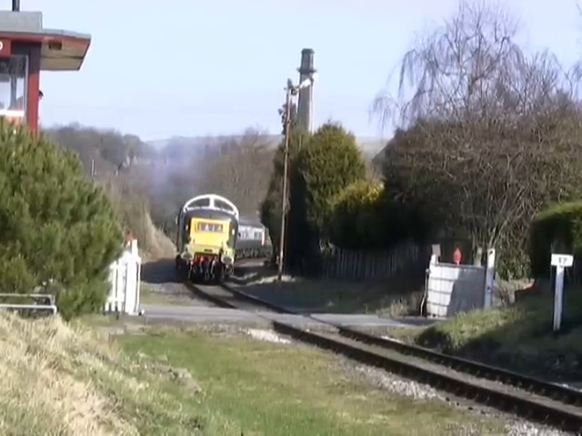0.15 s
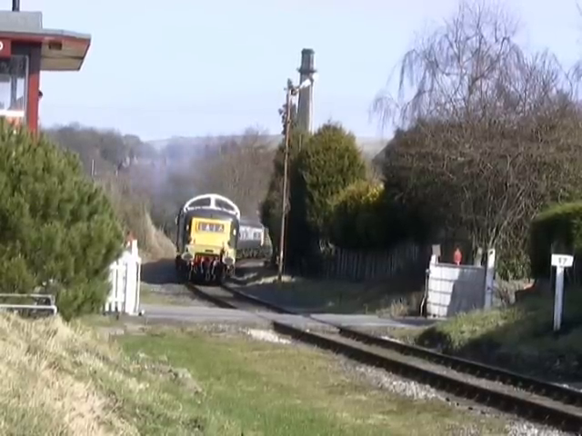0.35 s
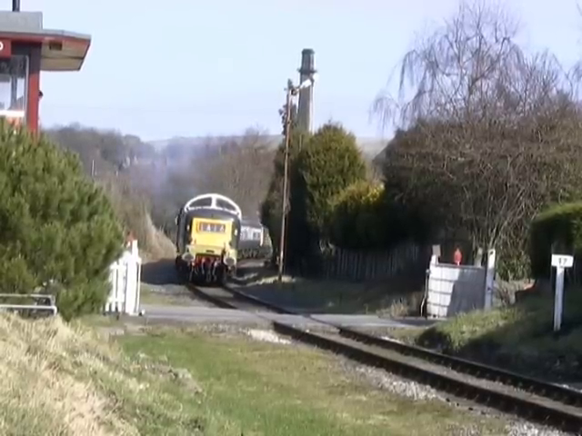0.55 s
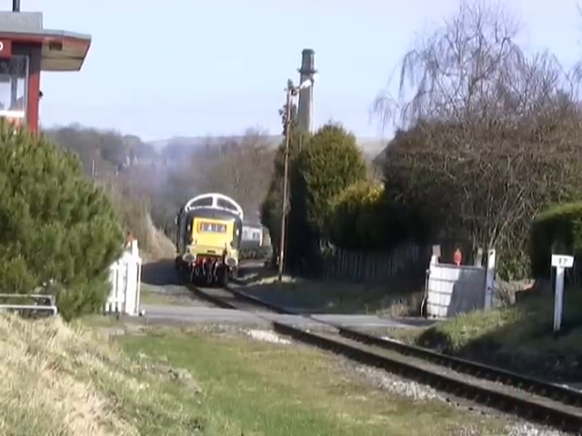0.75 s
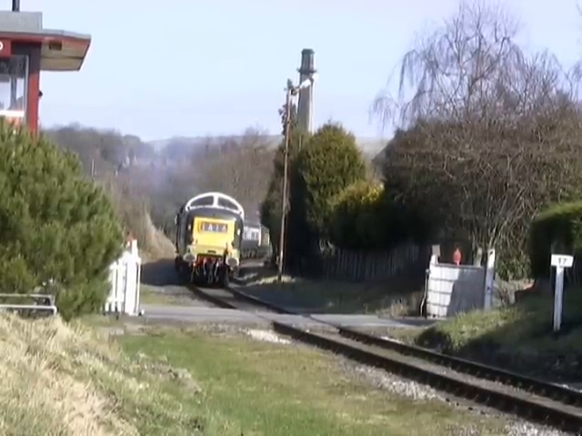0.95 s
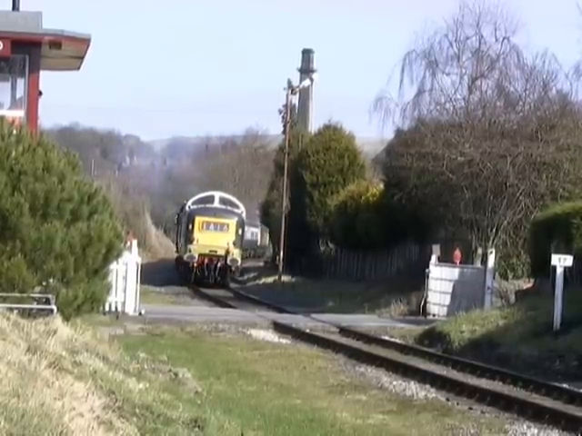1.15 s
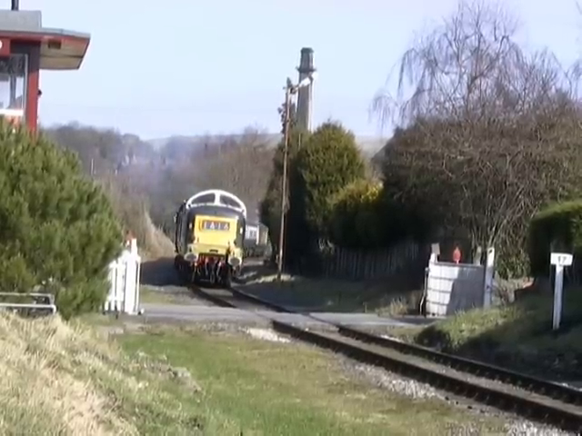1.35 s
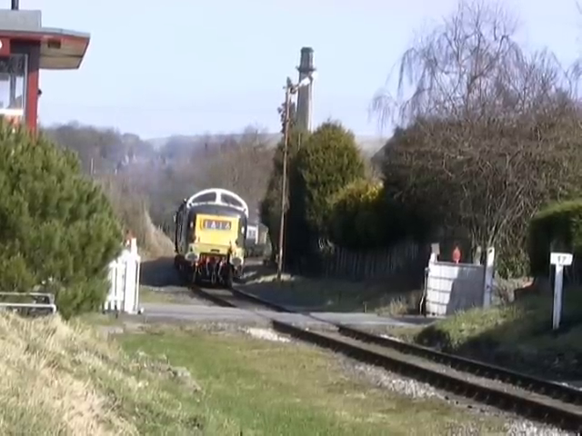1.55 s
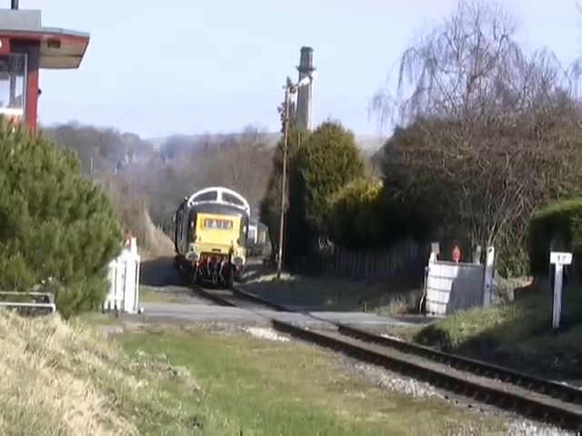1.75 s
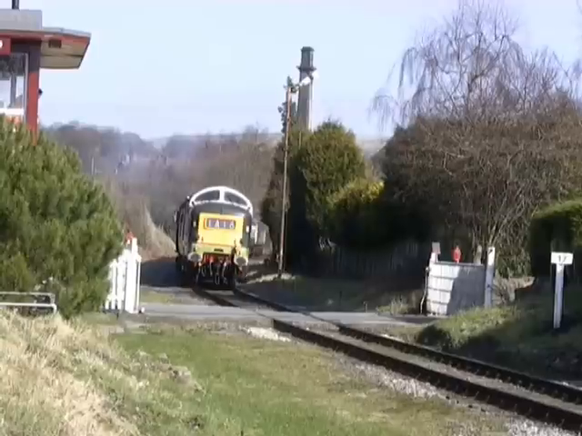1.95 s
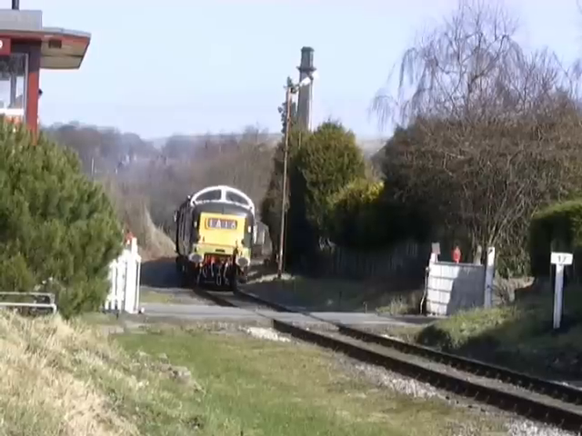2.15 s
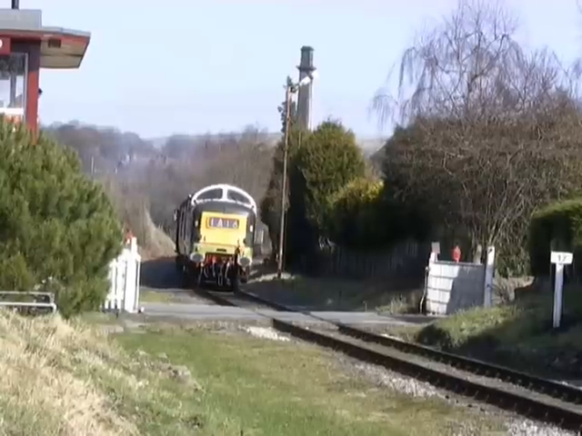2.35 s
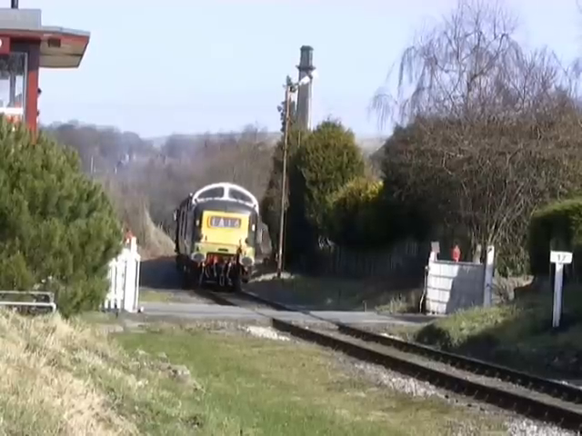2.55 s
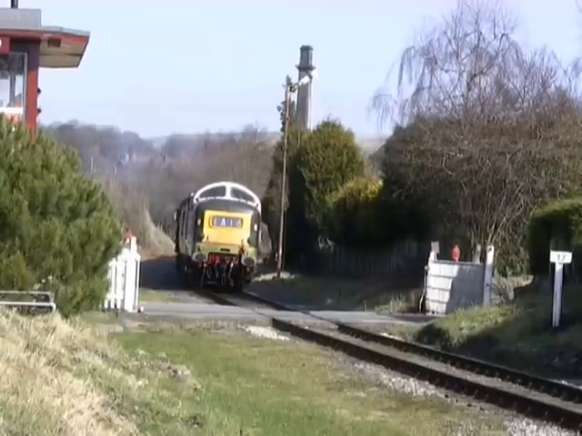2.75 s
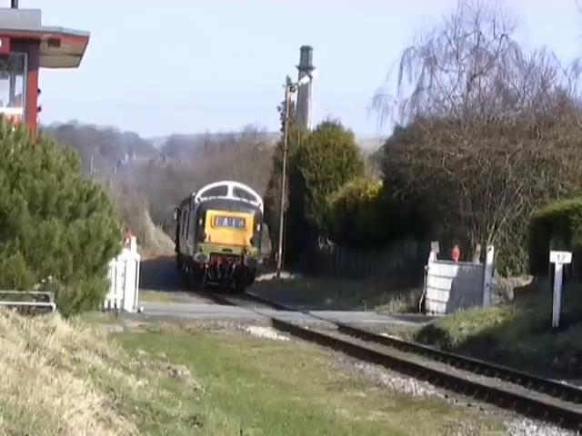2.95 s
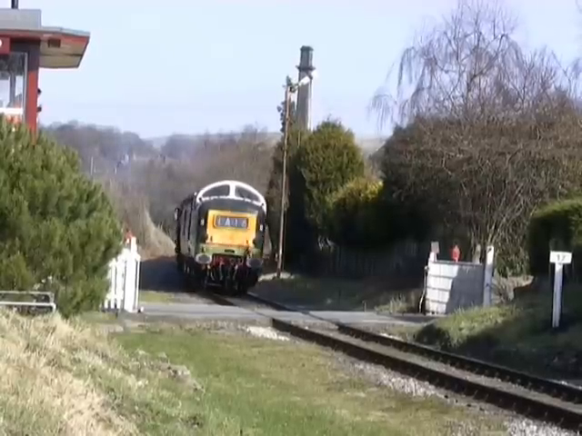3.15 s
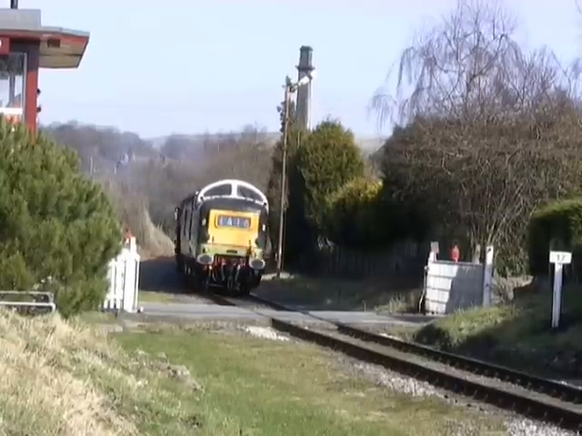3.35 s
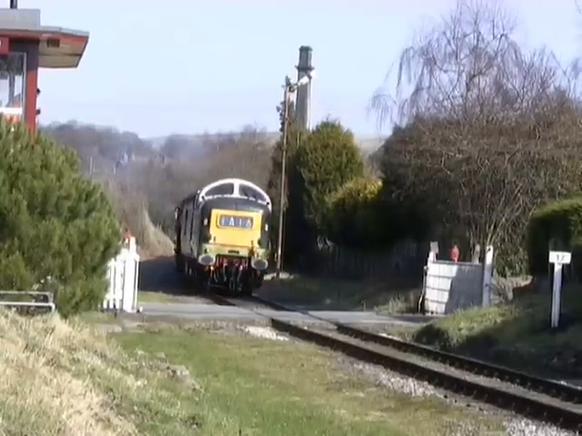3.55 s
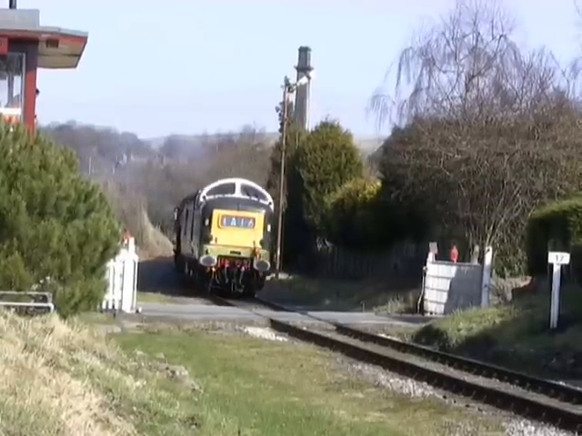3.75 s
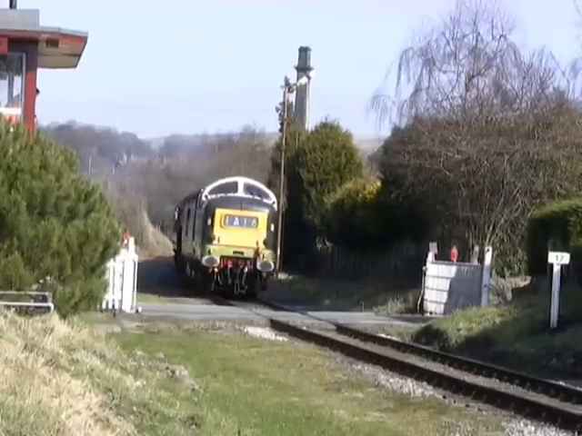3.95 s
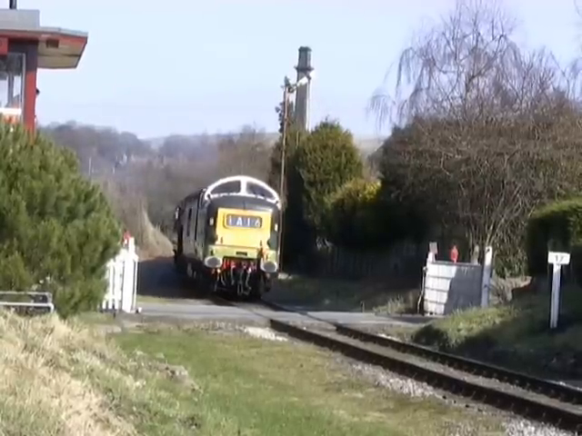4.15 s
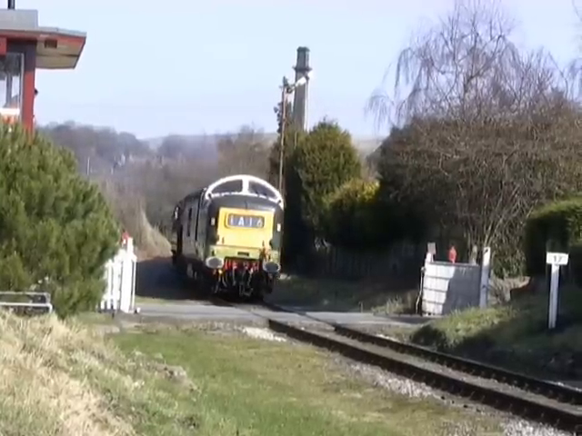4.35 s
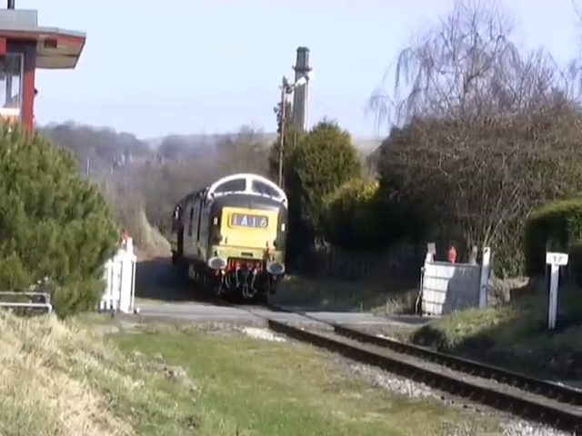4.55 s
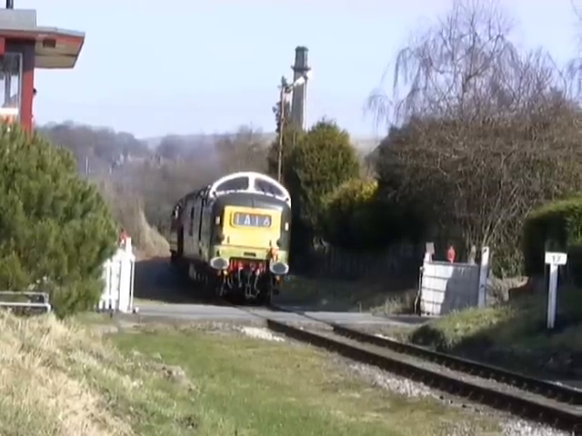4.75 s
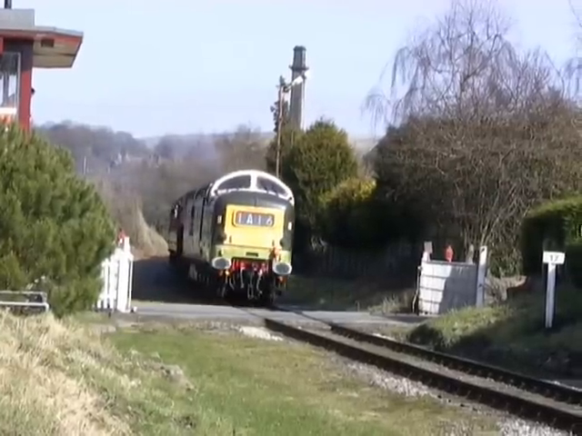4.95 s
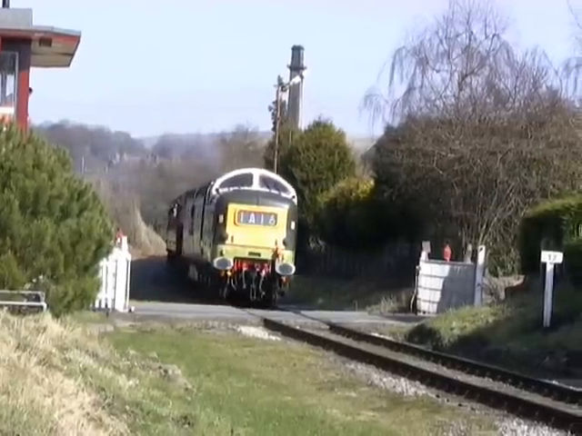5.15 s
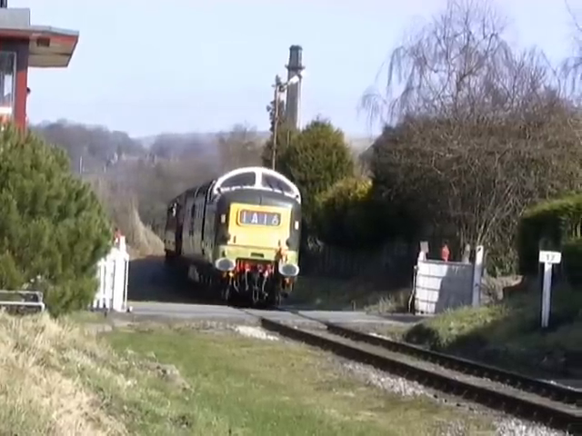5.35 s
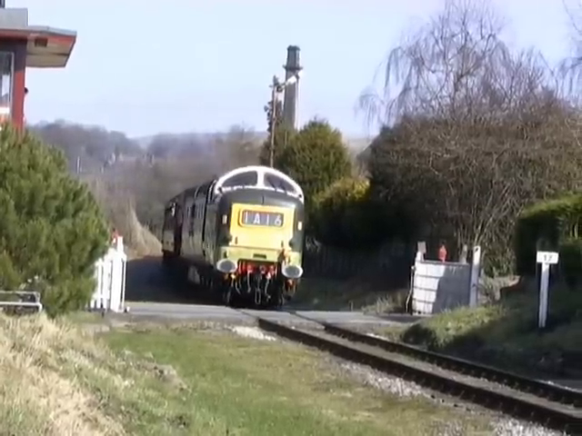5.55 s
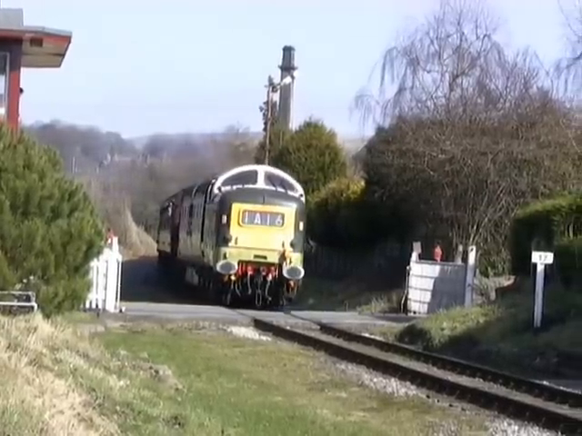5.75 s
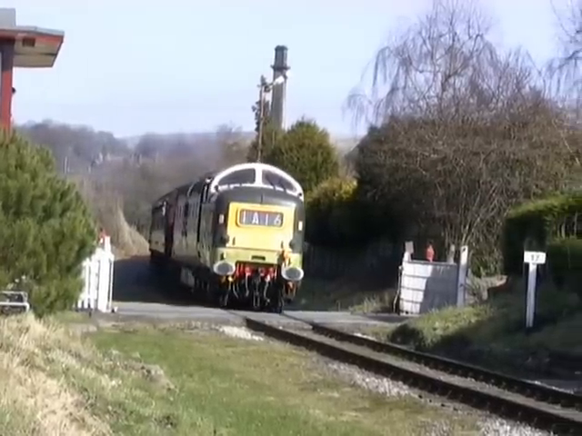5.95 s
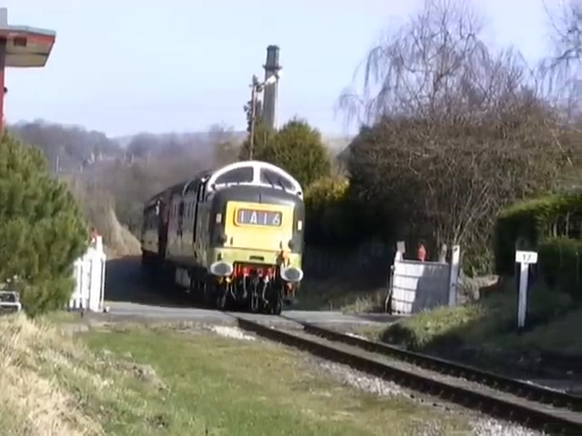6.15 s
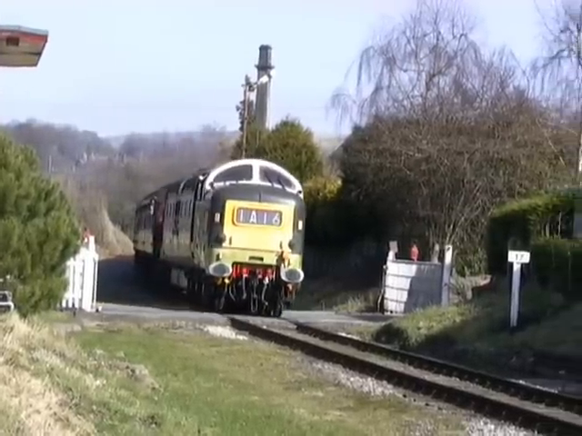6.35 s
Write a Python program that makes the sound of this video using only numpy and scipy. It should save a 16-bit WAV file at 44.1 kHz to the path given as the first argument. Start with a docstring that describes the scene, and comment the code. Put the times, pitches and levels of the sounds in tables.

```python
"""A two-stroke diesel locomotive opens up and rolls towards a listener beside the track.
Sines at crank orders beat against a tone geared to the crank; whines and whistles are narrow-band noise
inside a broad roar of shaped noise. Faint filtered clicks follow, low noise swells as wind stirs two
microphone ports, two crank orders grow as the load comes on, and the treble noise rises as it nears."""
import sys
import numpy as np
from scipy import signal
from scipy.fft import rfft, irfft, next_fast_len
from scipy.io import wavfile
from scipy.ndimage import uniform_filter1d

SR = 44100
rng = np.random.default_rng(int(sys.argv[2]) if len(sys.argv) > 2 else 0)


def unload_wav(signal):
    """Save mono or channel-first audio to the path in sys.argv[1] as 16-bit WAV at rate SR, clipped to [-1, 1]."""
    wavfile.write(
        sys.argv[1],
        SR,
        np.round(np.clip(np.atleast_2d(signal).T, -1, 1) * 32767).astype(np.int16),
    )


N = 283122
TIME = np.arange(N) / SR

# Broadband level of the locomotive. Each row: time in seconds, roar level in dB rms before puffing,
# lower treble level in dB rms before flicker.
BROADBAND_LEVEL = [(0, -27.5, -49), (.35, -26.5, -51), (.6, -26, -50), (1.1, -27, -50), (1.5, -28, -52),
                   (2, -28.5, -53), (3, -27.5, -50.5), (3.38, -26.5, -48), (3.45, -25, -45),
                   (3.55, -25.5, -49), (3.9, -26, -46.5), (4.25, -25, -44.5), (4.4, -24, -45),
                   (4.7, -22.5, -45), (4.76, -23, -42), (4.9, -22.5, -42), (5.3, -21.5, -41.5),
                   (5.5, -24.5, -41.5), (5.62, -21.5, -41.5), (5.7, -20.5, -38), (5.86, -20.5, -37.5),
                   (5.92, -21, -39.5), (5.97, -24.5, -42.5), (6.15, -21, -40), (6.42, -22, -41)]
# Coherence between the channels. Each row: frequency in Hz, left-right likeness from 0 to 1.
CHANNEL_LIKENESS = [(60, 0.88), (300, 0.97), (1500, 0.93), (4000, 0.74), (9000, 0.52)]


def gain_of(db):
    """Level to amplitude: 20 dB is a factor of ten."""
    return 10 ** (np.asarray(db) / 20)


def evened(x):
    """Power normalisation: scales the mean square to 1."""
    return x / np.sqrt(np.mean(x ** 2) + 1e-20)


def read(points, hz):
    """Interpolates a spectrum along a logarithmic frequency axis."""
    f, value = np.transpose(points)
    return np.interp(np.log(hz + 1), np.log(f + 1), value)


def columns(rows, t=TIME):
    """Linear interpolation of each column of a curve table at times t."""
    s, *rest = np.transpose(rows)
    return [np.interp(t, s, c) for c in rest]


def turns_of(hz):
    """Phase is the time integral of frequency, here in turns."""
    return np.cumsum(hz) / SR


def drift(rate_hz, span=10):
    """Slow chance of rms 1: random-phase sines from rate_hz / span to rate_hz, power falling as 1/f."""
    t = TIME[::256]
    waves = 0
    for f in np.geomspace(rate_hz / span, rate_hz, 16):
        waves = waves + np.sin(2 * np.pi * (f * t + rng.random())) / np.sqrt(f)
    return np.interp(TIME, t, evened(waves))


def noise(colour_db, likeness, patchy_db, size=1024):
    """Partly coherent two-channel noise of rms 1, shaped by colour_db(hz, t) and mottled by patches."""
    frames = N * 4 // size + 5
    hz = np.fft.rfftfreq(size, 1 / SR)[:, None]
    a, b, c, d, patches = rng.standard_normal((frames, len(hz), 5)).T
    patches = uniform_filter1d(patches, 10, 0)  # smooth over frequency, then time
    patches = evened(uniform_filter1d(patches, 12, 1))
    shape = gain_of(colour_db(hz, np.arange(frames) * size / 4 / SR)) * np.ones(frames)
    shape = shape / np.linalg.norm(shape, axis=0)  # equal power per frame ahead of the patches
    shape = shape * gain_of(patchy_db * patches)
    same = np.clip(likeness(hz), -1, 1)
    left, other = a + 1j * b, c + 1j * d
    right = same * left + np.sqrt(1 - same ** 2) * other
    spectra = np.array([left, right]) * shape
    return evened(signal.istft(spectra, nperseg=size, noverlap=size * 3 // 4)[1][:, :N])


def whistle(hz, width_hz, steady):
    """Random modulation broadens a carrier on the curve hz to rms 1; steady is its share of even level."""
    r = np.exp(-np.pi * width_hz / SR)  # pole of the low-pass, applied twice
    slow = rng.standard_normal(N) + 1j * rng.standard_normal(N)
    for _ in range(2):
        slow = signal.lfilter([1 - r], [1, -r], slow)
    slow = slow / (abs(slow) + 1e-12) ** steady
    return evened((slow * np.exp(2j * np.pi * turns_of(hz))).real)


def singing(multiple, t=TIME):
    """Level modulation in dB: an arch for each time that one tone sings out or drops away."""
    # Each row: middle in seconds, length in seconds, rounded multiple of the crank, rise in dB.
    arches = [(.2, .3, 73, 6), (.6, 1.6, 80, -9), (.32, .84, 44, 7), (.57, .32, 21, 11), (.65, .78, 57, 15),
              (.7, .65, 42, 12), (.75, .65, 55, 12), (.77, .65, 56, 18), (.33, .16, 27, 9), (.8, .5, 27, 8),
              (.8, .65, 48, 6), (.8, .78, 47, 10), (.87, .84, 45, 7), (1.05, .65, 46, 8),
              (1.2, .39, 43, 11), (1.25, .35, 55, 9), (1.22, .45, 54, 11), (1.3, .65, 35, 12),
              (1.55, .52, 34, 9), (.95, .5, 33, 5), (1.7, .52, 54, 11), (1.75, .39, 25, 9),
              (1.85, .52, 26, 9), (2.54, .52, 27, 4), (2.57, .32, 25, 10), (2.84, .39, 12, 7),
              (3.59, .3, 27, 6), (3.69, .39, 15, 8), (4.23, .42, 27, 10), (4.41, .32, 13, 6),
              (4.74, 1.1, 12, 5), (4.72, .66, 27, -10), (4.95, .55, 80, 8), (4.99, .39, 19, 8),
              (5.04, .39, 42, 9), (5.22, .34, 27, 8), (5.35, .2, 80, 12), (5.5, .72, 48, 12),
              (5.53, .22, 27, -7), (5.69, .52, 31, 12), (5.4, .5, 55, 8), (5.85, .5, 55, 9),
              (5.76, .16, 27, 8), (5.86, .1, 27, -6), (5.78, .3, 45, 13), (5.89, .52, 19, 8),
              (5.88, .62, 34, 14), (6.1, .4, 27, 11), (6.12, .62, 73, 10), (6.19, .52, 80, 6),
              (6.26, .32, 12, 7), (6.26, .32, 45, 9), (6.29, .3, 15, 6), (6.29, .3, 55, 6)]
    rise = 0
    for s, length, k, rise_db in arches:
        if k == round(multiple):
            angle = np.pi * np.clip((t - s) / length, -.5, .5)
            rise = rise + rise_db * np.sqrt(abs(np.cos(angle)))
    return rise


def strong_tones(crank_hz, order_db, geared_db):
    """Periodic exhaust gives crank orders; a geared tone near order 10 beats against it."""
    # Crank orders with their own level curves.
    loud_orders = (7, 9)
    # Orders that grow with load. Each row: order, light level in dB rms, loaded level in dB rms,
    # before waver.
    loaded_orders = [(8, -44, -31), (10, -35.5, -24.5)]
    # Start and end of the load coming on, in seconds.
    load_times = (2.3, 4.6)
    geared_multiple, geared_lag_turns = 9.89, .15  # the lag behind order 10 sets the phase of the beat
    waver_db, waver_turns = 2, .04
    turns = turns_of(crank_hz)
    load = np.sin(np.pi / 2 * np.interp(TIME, load_times, (0, 1))) ** 2
    out = np.zeros(N)
    for k, db in zip(loud_orders, order_db):
        phase = k * turns + rng.random() + waver_turns * drift(6)
        out += gain_of(db + waver_db * drift(14)) * np.cos(2 * np.pi * phase)
    for k, light_db, loaded_db in loaded_orders:
        start = rng.random()  # the last one, of order 10, also serves the geared tone
        db = light_db + load * (loaded_db - light_db) + 0.97 * drift(4.4)
        out += gain_of(db) * np.cos(2 * np.pi * (k * turns + start))
    phase = geared_multiple * turns + start - geared_lag_turns + waver_turns * drift(6.5)
    out += gain_of(geared_db + waver_db / 2 * drift(7.8)) * np.cos(2 * np.pi * phase)
    return np.sqrt(2) * out  # rms to peak of a sine


def weak_tones(crank_hz):
    """Harmonic series of the crank and geared tones; they swell and fade as the air path shifts."""
    # Each row: crank order, levels in dB rms while opening up, while easing and when near,
    # before singing and waver.
    crank_orders = [(3, -57, -53, -51), (5, -52, -49, -40), (6, -46, -56, -49), (11, -52, -53, -48),
                    (12, -45, -41, -37), (13, -43, -39, -37), (15, -44, -44, -38), (16, -50, -44, -41),
                    (17, -51, -48, -48), (18, -45, -45, -45), (19, -45, -45, -42), (20, -45, -51, -45),
                    (21, -47, -52, -50), (24, -45, -47, -44), (25, -42, -45, -46), (26, -52, -46, -50),
                    (27, -41, -48, -39), (28, -51, -54, -48), (30, -47, -50, -58), (31, -48, -53, -52),
                    (32, -49, -59, -58), (33, -41, -48, -48), (34, -40, -52, -52), (35, -46, -58, -58),
                    (36, -53, -63, -56), (37, -55, -64, -51), (39, -48, -60, -53), (40, -53, -62, -57),
                    (41, -50, -53, -57), (42, -52, -64, -47), (43, -50, -62, -61), (44, -50, -59, -62),
                    (45, -45, -50, -47), (46, -44, -50, -61), (47, -48, -54, -53), (48, -48, -57, -53),
                    (49, -52, -64, -55), (51, -54, -67, -61), (52, -56, -61, -62), (54, -53, -57, -59),
                    (55, -48, -65, -49), (56, -62, -64, -56), (57, -58, -69, -64), (59, -60, -72, -67)]
    # Each row: multiple of the crank, the same three levels in dB rms before waver.
    geared_tones = [(6.7, -47, -46, -42), (9.54, -45, -45, -42), (16.48, -41, -42, -38),
                    (19.79, -46, -50, -48), (29.67, -47, -50, -47), (39.58, -50, -49, -48)]
    # Times of the three levels, in seconds.
    level_times = (.8, 2.6, 5.2)
    # Upper orders start a little flat. Each row: time in seconds, their share of the crank speed.
    upper_speed = [(0, .9915), (.8, .994), (2, .9975), (2.9, 1)]
    upper_from_order, waver_db = 21, 2.2
    turns = turns_of(crank_hz)
    upper_turns = turns_of(crank_hz * columns(upper_speed)[0])
    t = TIME[::64]
    tones = []
    for row in crank_orders:
        angle = upper_turns if row[0] >= upper_from_order else turns
        tones.append((row, angle, singing(row[0], t)))
    for row in geared_tones:
        tones.append((row, turns, 0))
    out = np.zeros(N)
    for (k, *levels_db), angle, rise_db in tones:
        db = np.interp(t, level_times, levels_db) + rise_db + waver_db * drift(12)[::64]
        phase = k * angle + rng.random() + 0.056 * drift(8)
        out += np.interp(TIME, t, gain_of(db)) * np.cos(2 * np.pi * phase)
    return np.sqrt(2) * out


def gear_whines(crank_hz):
    """Gear meshing sounds at fixed multiples of shaft speed; the whines follow the roar and sing out."""
    # Each row: multiple of the crank, width setting in Hz, level in dB rms with the roar at -25 dB,
    # before singing and waver.
    whines = [(73.25, 20, -51), (80, 26, -53)]
    follow_db = 0.96 * (columns(BROADBAND_LEVEL)[0] + 25)
    out = np.zeros(N)
    for k, width_hz, db in whines:
        level_db = db + follow_db + singing(k) + 3.5 * drift(2.8)
        out += gain_of(level_db) * whistle(k * crank_hz, width_hz, steady=0.97)
    return out


def blower_whistles(crank_hz):
    """Amplitude modulation beads two blower whistles; frequency modulation makes the lower one flutter."""
    # Each row: time in seconds, whistle in Hz and level in dB rms before flutter and beads,
    # share of flutter from 0 to 1.
    low_whistle = [(0, 1853, -55, 0), (.55, 1912, -51, 0), (.85, 1922, -47.5, .1), (1.1, 1950, -50, .2),
                   (1.22, 1976, -46, 0), (1.38, 1982, -42.5, 0), (1.5, 1982, -47, 0),
                   (1.8, 1978, -46.5, .1), (1.95, 1965, -46.5, .5), (2.22, 1995, -47.5, .6),
                   (2.32, 2012, -43, 1), (2.62, 2008, -43.5, 1), (2.72, 1978, -44, 1),
                   (2.95, 1976, -42, .8), (3.15, 1955, -42.5, .5), (3.55, 1955, -46.5, .3),
                   (3.75, 1965, -50, .2), (4.15, 1960, -50, .2), (4.3, 1950, -43.5, .2),
                   (4.62, 1968, -43.5, .2), (4.66, 1962, -47, .2), (4.75, 1960, -41, .2),
                   (5.0, 1966, -38, .2), (5.15, 1982, -44, .2), (5.25, 1982, -40, .2),
                   (5.4, 1976, -40.5, .2), (5.58, 1975, -43, .2), (5.8, 1990, -38, .1),
                   (5.97, 1972, -42.5, .2), (6.18, 1960, -38, .2), (6.42, 1985, -40, .2)]
    # Each row: time in seconds, whistle in Hz, level in dB rms before beads.
    high_whistle = [(0, 2150, -64), (.4, 2174, -53), (.65, 2170, -55), (.8, 2190, -50), (.95, 2250, -53),
                    (1.2, 2215, -52), (1.5, 2240, -62), (2.9, 2240, -56), (3.03, 2280, -49),
                    (3.09, 2275, -56), (3.15, 2270, -47), (3.25, 2280, -55), (3.4, 2260, -50),
                    (3.75, 2270, -53), (3.88, 2281, -45), (4.2, 2287, -42), (4.3, 2292, -48),
                    (4.5, 2284, -45), (5.0, 2287, -44.5), (5.15, 2285, -50), (5.35, 2304, -45),
                    (5.47, 2298, -48), (5.65, 2300, -42), (5.82, 2300, -47), (6, 2304, -48),
                    (6.2, 2306, -42), (6.42, 2302, -43)]
    flutter_hz, flutter_db = 42, 3.5
    flutter_top_s, rise_share = 2.425, .75
    turns = turns_of(crank_hz)
    beads = evened(gain_of(1.6 * np.cos(2 * np.pi * turns) + 3.6 * drift(55, span=2.5)))
    hz, db, share = columns(low_whistle)
    # Once in two crank turns pitch and level climb, then drop.
    cycle = np.pi * (turns - turns[round(flutter_top_s * SR)]) + 2 * np.pi * rise_share
    flutter = share * signal.sawtooth(cycle, rise_share)
    low = whistle(hz + flutter_hz * flutter, 56, steady=.6)
    out = gain_of(db + flutter_db * flutter) * beads * low
    hz, db = columns(high_whistle)
    return out + gain_of(db) * beads * whistle(hz, 34, steady=.6)


def roar(turns):
    """Turbulent exhaust is broadband noise, its amplitude modulated by puffs at one and two per turn."""
    # Each row: frequency in Hz, relative level in dB per Hz; revving up, then steady.
    revving = [(25, -46), (60, -17), (115, -9.5), (170, -11.5), (230, -10.5), (340, -8), (400, -14),
               (520, -9.5), (670, -12), (800, -16.5), (940, -18), (1350, -25.5), (1750, -34), (2300, -36),
               (3000, -36.5), (9000, -92.5)]
    steady = [(25, -39.5), (60, -16), (115, -6), (170, -1), (230, -11), (340, -14.5), (400, -14),
              (520, -15.5), (670, -21), (800, -15.5), (940, -22), (1350, -23.5), (1750, -21.5),
              (2300, -23.5), (3000, -55.5), (9000, -93.5)]

    def colour(hz, t):
        """Linear blend in dB: the revving share fades over 5.8 s."""
        share = np.interp(t, (0, 5.8), (0.7, 0.24))
        return share * read(revving, hz) + (1 - share) * read(steady, hz)

    puff = gain_of(0.41 * np.cos(2 * np.pi * turns) + 0.6 * np.cos(4 * np.pi * turns))
    turbulence = noise(colour, lambda hz: read(CHANNEL_LIKENESS, hz), patchy_db=1.24, size=2048)
    return gain_of(columns(BROADBAND_LEVEL)[0]) * puff * turbulence


def rush():
    """Broadband treble of fans and wheels; air absorption with distance keeps its top end low at first."""
    # Each row: frequency in Hz, relative level in dB per Hz; lower treble, then top treble.
    low_colour = [(1500, -5), (2500, -0.5), (3200, -2), (4200, -7), (5500, -20), (8000, -30.5),
                  (12000, -73.5)]
    top_colour = [(3000, -15), (5000, 0), (6500, -4), (8000, -9), (10000, -15), (11500, -27.5),
                  (15000, -48)]
    # Each row: time in seconds, top treble level in dB rms before flicker.
    top_level = [(0, -63.5), (0.79, -62), (1.95, -66), (2.77, -63), (3.38, -61.5), (3.44, -58.5),
                 (3.52, -61), (3.75, -54.5), (3.85, -57.5), (4.13, -55.5), (4.7, -55.5), (4.76, -53),
                 (4.88, -49.5), (4.95, -51), (5.3, -51), (5.5, -53), (5.63, -55), (5.68, -50.5),
                 (5.78, -48), (5.82, -48), (5.86, -47), (5.92, -49), (5.96, -54), (6.04, -54), (6.13, -51),
                 (6.42, -53)]

    def likeness(hz):
        """Coherence between the channels by frequency."""
        return read(CHANNEL_LIKENESS, hz)

    low_db = columns(BROADBAND_LEVEL)[1]
    top_db = columns(top_level)[0] + 0.82 * drift(7.2)
    low = noise(lambda hz, t: read(low_colour, hz), likeness, patchy_db=0.3, size=512)
    top = noise(lambda hz, t: read(top_colour, hz), likeness, patchy_db=1.7, size=512)
    flicker = gain_of(0.4 * drift(30))
    return flicker * (gain_of(low_db) * low + gain_of(top_db) * top)


def wind():
    """Turbulent pressure at two ports: lumpy low noise, partly opposed in phase from port to port."""
    # Each row: time in seconds, level in dB rms before the lumps and their left-right offset.
    wind_level = [(0, -51), (1.4, -37.5), (1.9, -32.5), (3.4, -28.5), (4.2, -31), (4.5, -32), (5, -27),
                  (5.6, -34.5), (6.15, -35), (6.42, -39)]
    # Each row: frequency in Hz, relative level in dB per Hz.
    gust_colour = [(8.8, -52), (15, -14.5), (59, 1.5), (145, -0.5), (171, 3), (210, -7), (353, -15.5),
                   (400, -22), (520, -52.5), (880, -120)]
    lumps = gain_of(np.array([1.8 + 1.2 * drift(22), -1.2 + 3.2 * drift(6.0)]))
    rumble = noise(lambda hz, t: read(gust_colour, hz), lambda hz: -.4 + 0 * hz, patchy_db=0.8, size=4096)
    return gain_of(columns(wind_level)[0]) * lumps * rumble


def hiss():
    """Stationary noise with negative correlation between channels forms a constant background."""
    # Each row: frequency in Hz, relative level in dB per Hz.
    hiss_colour = [(1000, -11.5), (2500, -11.5), (4000, -13.5), (6000, -4), (8000, -12), (9500, -7.5),
                   (11000, -7), (11600, -14.5), (14800, -22)]
    floor = noise(lambda hz, t: read(hiss_colour, hz), lambda hz: -.5 + 0 * hz, patchy_db=-2.0, size=512)
    return gain_of(-60) * floor


def ticks():
    """Impulsive sound close by: short decaying bursts of noise, band-passed to be bright."""
    # Each row: start in seconds, peak level in dB before panning, left minus right in dB.
    clicks = [(1.602, -51, -5), (1.7699, -51, 1), (1.8845, -48, -4), (2.148, -53, -7), (2.2587, -54, 2),
              (2.534, -52, -1.0), (4.1629, -49, 8), (4.9625, -52, 15)]
    length = 400  # samples
    out = np.zeros((2, N + length))
    t = np.arange(length) / SR
    grains = rng.standard_normal((len(clicks), length)) * gain_of(-60 * t / 0.015)  # 60 dB in 15 ms
    band = signal.butter(4, [5200, 11000], "band", fs=SR, output="sos")
    grains = signal.sosfilt(band, grains)
    for (s, db, pan_db), grain in zip(clicks, grains):
        at = round(s * SR)
        level_db = db + np.array([[.5], [-.5]]) * pan_db
        out[:, at:at + length] += gain_of(level_db) * grain / abs(grain).max()
    return out[:, :N]


def scene():
    """Superposition: level differences set the locomotive a little left; wind, hiss and ticks are added."""
    # Each row: time in seconds, crank speed in turns per second, then levels in dB rms before waver
    # of crank order 7, crank order 9 and the geared tone.
    engine = [(0.0, 17.2, -31.5, -28.6, -26.1), (0.54, 17.65, -33, -49.2, -26.5),
              (.92, 17.973, -31, -39, -25.5), (1.07, 18.1, -34.5, -35.0, -28.5),
              (1.2, 18.167, -35, -33, -38), (1.34, 18.24, -30, -31.8, -31),
              (1.6, 18.315, -28.7, -29.0, -23.5), (1.8, 18.33, -29.5, -26, -26.5),
              (2.14, 18.31, -31.5, -23.5, -28.3), (2.32, 18.252, -30, -25.5, -34),
              (2.55, 18.182, -32.6, -26.0, -29), (2.7, 18.139, -30, -33, -26),
              (2.8, 18.11, -29.5, -27.5, -24.5), (2.94, 18.07, -28.3, -27.8, -24.3),
              (3.48, 18.1, -26, -25.9, -25.2), (4.01, 18.19, -24.9, -24.7, -24.4),
              (4.6, 18.22, -24.4, -24.4, -27.3), (5.0, 18.27, -24.8, -20.8, -24.0),
              (5.45, 18.325, -23.9, -21.6, -20.9), (5.8, 18.36, -24.6, -22.2, -20.4),
              (6.08, 18.36, -28.2, -25, -22), (6.22, 18.36, -27, -21, -18.5),
              (6.42, 18.34, -27.5, -21.7, -21.9)]
    # Each row: frequency in Hz, left minus right in dB.
    left_lean = [(60, -0.5), (91, 2.5), (140, 2.5), (210, 2.5), (320, 2), (490, 2.0), (740, 2.5),
                 (1130, 1.5), (1710, 1), (2600, 1)]
    crank_hz, *order_db, geared_db = columns(engine)
    tones = strong_tones(crank_hz, order_db, geared_db) + weak_tones(crank_hz)
    tones = tones + gear_whines(crank_hz) + blower_whistles(crank_hz)
    loco = tones + roar(turns_of(crank_hz)) + rush()
    # Mirrored ends keep the spectral panning free of edge clicks.
    pad = SR // 10
    size = next_fast_len(N + 2 * pad)
    padded = np.pad(loco, ((0, 0), (pad, pad)), "reflect", reflect_type="odd")
    pan_db = np.array([[.5], [-.5]]) * read(left_lean, np.fft.rfftfreq(size, 1 / SR))
    spectrum = rfft(padded, size, axis=1) * gain_of(pan_db)
    loco = irfft(spectrum, size, axis=1)[:, pad:pad + N]
    return loco + wind() + hiss() + ticks()


def record(dry):
    """Linear-phase low-pass filtering limits the band; the converter adds a small constant offset."""
    running = np.pad(dry, ((0, 0), (255, 255)), "reflect", reflect_type="odd")  # mirrored past both ends
    low_pass = signal.firwin(511, 14750, window=("kaiser", 9), fs=SR)  # cutoff in Hz
    cut = signal.oaconvolve(running, low_pass[None], "valid", axes=1)
    return cut + .0028


dry = scene()
out = record(dry)
unload_wav(out)
```